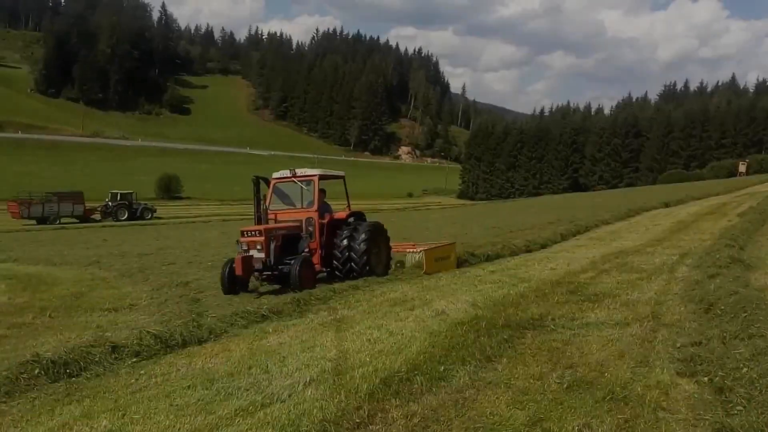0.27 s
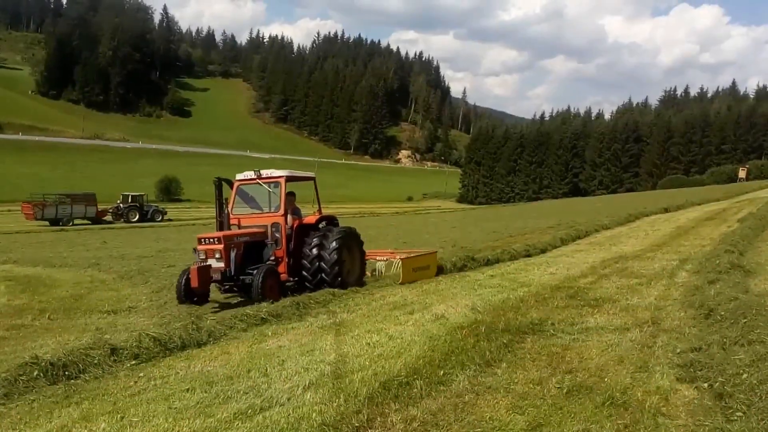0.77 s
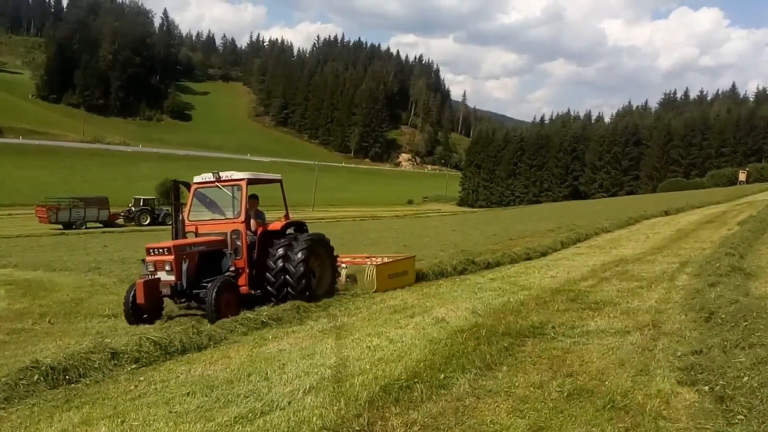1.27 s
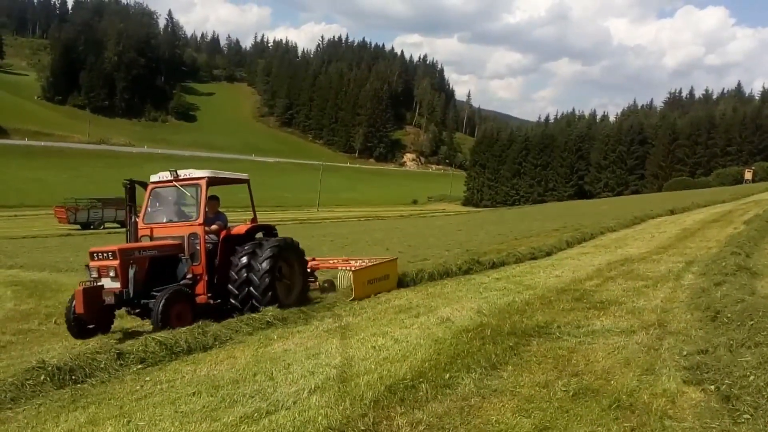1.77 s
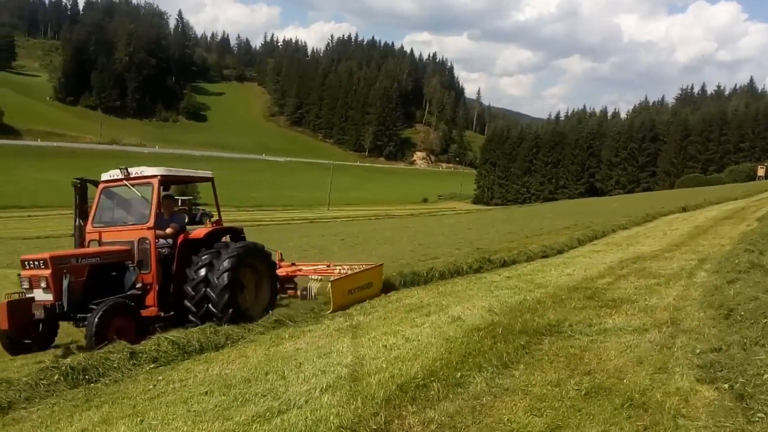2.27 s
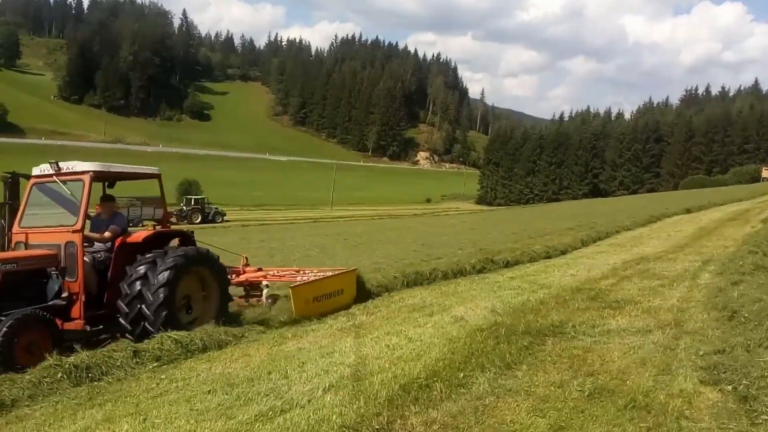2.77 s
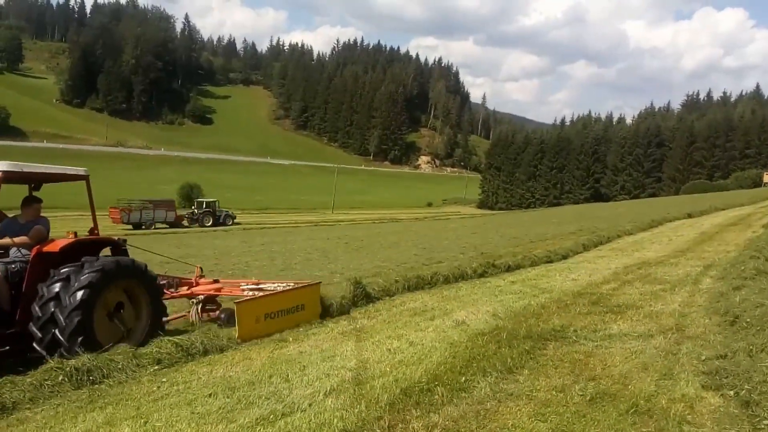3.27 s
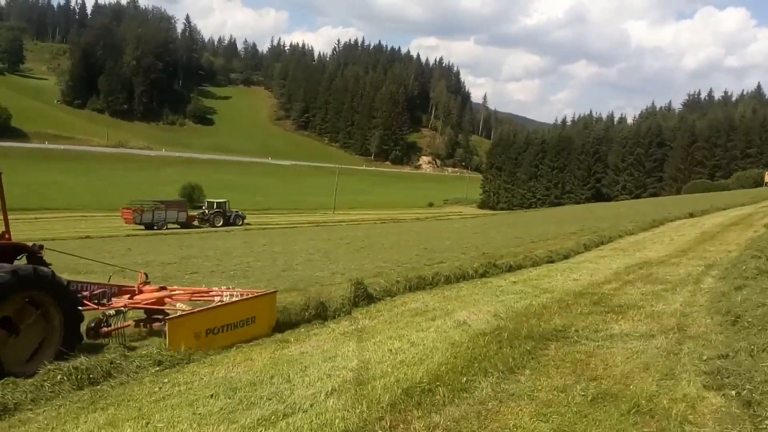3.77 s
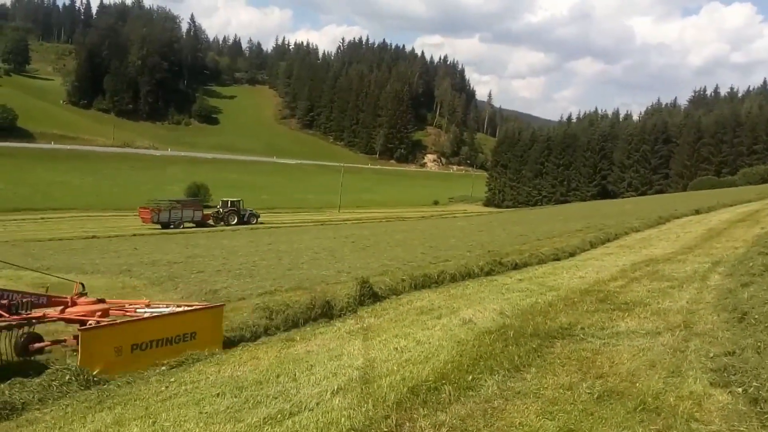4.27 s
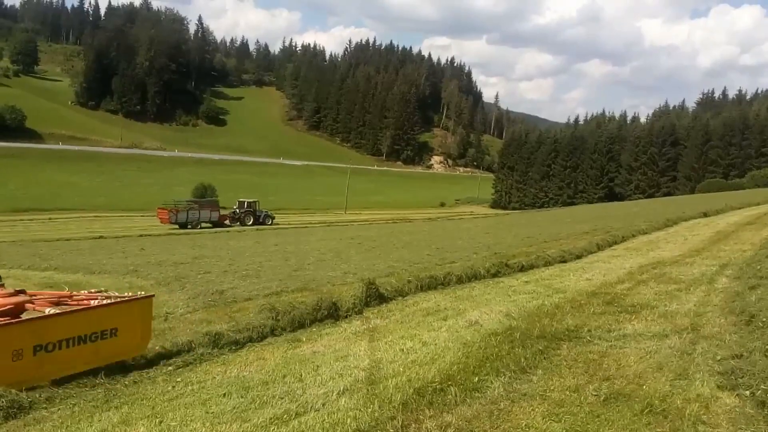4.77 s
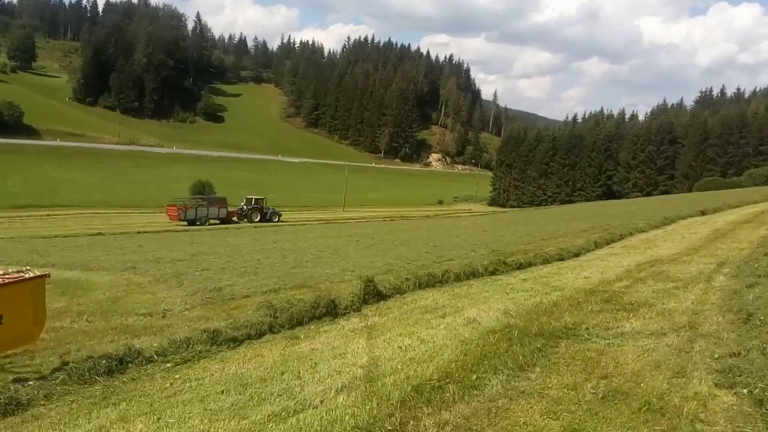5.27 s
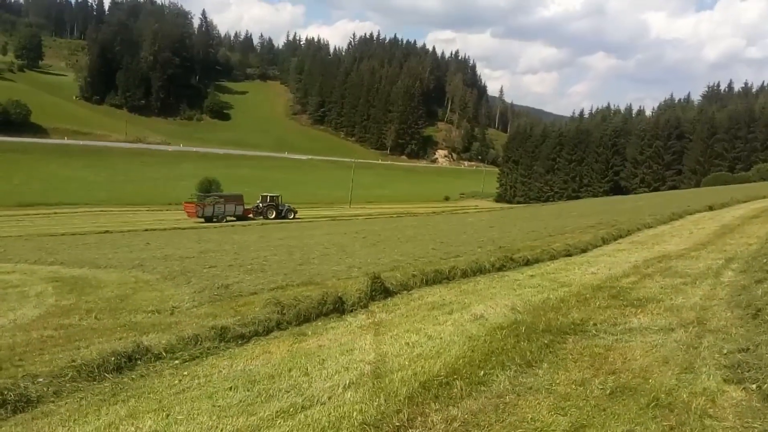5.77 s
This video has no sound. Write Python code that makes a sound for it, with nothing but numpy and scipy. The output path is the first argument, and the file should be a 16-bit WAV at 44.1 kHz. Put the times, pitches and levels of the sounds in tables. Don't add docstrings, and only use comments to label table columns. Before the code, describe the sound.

Steady throbbing tractor engine with knocking, faint gear whine and hissing rake tines passes close by outdoors, turning away amid soft low wind gusts.

```python
import sys
import numpy as np
from scipy import signal
from scipy.fft import rfft, irfft, next_fast_len
from scipy.io import wavfile
from scipy.ndimage import uniform_filter1d, map_coordinates

SR = 44100
rng = np.random.default_rng(int(sys.argv[2]) if len(sys.argv) > 2 else 0)


def attenuation_scalar(level_db):
    decades = np.asarray(level_db, float) / 20
    return 10 ** decades


def master_out(mix):
    frames = np.transpose(np.atleast_2d(mix))
    ceiling = np.clip(frames, -1, 1)
    pcm = np.round(ceiling * 32767).astype(np.int16)
    wavfile.write(sys.argv[1], SR, pcm)


N = 264952


def unit(x):
    return x / np.sqrt(np.mean(x ** 2) + 1e-20)


def along(points, hz):
    f, v = np.transpose(points)
    return np.interp(np.log(hz + 1), np.log(f + 1), v)


def curves(rows, t=None):
    s, *columns = np.transpose(rows)
    times = np.arange(N) / SR if t is None else t
    return [np.interp(times, s, column) for column in columns]


def swells(rows, floor_db):
    t = np.arange(N) / SR
    total = attenuation_scalar(floor_db)
    for s, db, half_s in rows:
        total = total + attenuation_scalar(db) * np.exp(-((t - s) / half_s) ** 2)
    return 20 * np.log10(total)


def wobble(rate):
    coarse = np.arange(0, N + 64, 32)
    knots = rng.standard_normal(int(N * rate / SR) + 4)
    smooth = map_coordinates(knots, [coarse * rate / SR], mode="nearest")
    return np.interp(np.arange(N), coarse, smooth)


def filtered(x, response):
    m = next_fast_len(N + 8192)
    return irfft(rfft(x, m) * response(np.fft.rfftfreq(m, 1 / SR)), m)[..., :N]


def rush(spectrum, patchy_db):
    z = signal.stft(rng.standard_normal((3, N)), nperseg=512)[2]
    field = uniform_filter1d(rng.standard_normal(z.shape[1:]), size=5, axis=0)
    field = uniform_filter1d(field, size=10, axis=1)
    noise = signal.istft(z * attenuation_scalar(patchy_db * unit(field)), nperseg=512)[1][:, :N]
    return unit(filtered(noise, lambda hz: attenuation_scalar(along(spectrum, hz))))


def tone(turns, db, rough_db):
    return np.sqrt(2) * attenuation_scalar(db + rough_db * wobble(10)) * np.cos(2 * np.pi * turns)


# time_s, turn [0-1]
TURN = [(0, 0), (1, 0.09), (2, 0.24), (3, 0.39), (4.2, 0.67), (5.4, .86), (6, 0.96)]


def facing(values, t=None):
    return np.interp(curves(TURN, t)[0], np.linspace(0, 1, len(values)), values)


# time_s, rate_hz [twice the firing rate]
ENGINE = [(0, 90.7), (.4, 91.5), (.65, 91.8), (.9, 92.6), (1.4, 91.8), (1.9, 92.95), (2.15, 93),
          (2.4, 92.2), (2.65, 92.1), (3.1, 92.7), (4.2, 92.35), (4.6, 91.4), (4.9, 90.85), (5.15, 91.2),
          (5.4, 92.6), (5.65, 92.2), (6, 91.2)]


def engine_cycle():
    return np.cumsum(curves(ENGINE)[0]) / SR / 6 + 1 - .41 / 6


def throb(cycle, delay, decay, depth, sizes):
    firings = 3 * cycle - delay
    k = np.floor(firings).astype(int)
    u = (firings - k) / decay
    chance = attenuation_scalar(1.4 * rng.standard_normal(400))
    size = np.array(sizes)[k % 3] * chance[k % 400]
    return unit(1 + depth * size * u * np.exp(1 - u))


# pitch_hz, level_db
BUFFET = [(5, -12), (12, -15.5), (27, -4), (45, -29.5), (65, -8), (130, -14), (220, -11), (400, -41),
          (800, -69.5), (2000, -120)]
# peak_s, level_db, half_length_s
GUSTS = [
    (0, -35, 0.38),
    (1.5, -36, .25),
    (4.55, -27, 0.24),
    (5.65, -28, .2),
]


def breeze():
    shared, left, right = rush(BUFFET, patchy_db=3.0)
    level_db = swells(GUSTS, floor_db=-60) + 0.72 * wobble(27)
    return attenuation_scalar(level_db) * (0.22 * shared + 0.22 * np.array([left, right]))


# start_s, level_db [peak]
TICKS = [
    (1.4465, -58),
    (1.8352, -49.5),
    (2.4836, -56),
    (3.3865, -50),
    (4.2694, -58),
    (5.7404, -62),
]


def snaps():
    x, t = np.zeros(N), np.arange(400) / SR
    for s, db in TICKS:
        x[round(s * SR):][:400] += attenuation_scalar(db + 4 - 60 * t / .006) * rng.standard_normal(400)
    crisp = [(3000, -50), (8000, 1), (12000, -4), (15000, -12)]  # pitch_hz, level_db
    return filtered(x, lambda hz: attenuation_scalar(along(crisp, hz)))


# time_s, level_db
RAKE = [(0, -30), (.8, -29.5), (1.25, -27), (2.2, -28), (2.8, -27), (3.9, -27.5), (4.4, -25.5),
        (4.8, -25.5), (5.3, -27), (5.6, -26), (6, -27.5)]
# pitch_hz, level_db
GRASS = [(1500, -39), (2800, -11.5), (3600, -7), (4300, -2.5), (5000, -3), (5600, -7), (6200, -9),
         (6900, -18.5), (7600, -26.5), (8300, -35), (9500, -120)]
# pitch_hz, level_db
CHAFF = [(5000, -120), (6500, -41), (7500, -33), (8100, 1), (8800, 4.5), (9700, 1), (10500, 3),
         (11700, -4.5), (12600, -4.5), (14600, -10), (15400, -16), (17000, -120)]


def rake(cycle):
    load_db, = curves(RAKE)
    chaff_db = -55 + 0.64 * (load_db - load_db.mean())
    sweep_db = 0.71 * wobble(9) + 0.36 * wobble(30)
    pulse = throb(cycle, delay=0.13, decay=0.32, depth=0.53, sizes=[1, 1, 1])
    grass = attenuation_scalar(load_db) * attenuation_scalar(sweep_db) * rush(GRASS, patchy_db=1.0)
    chaff = attenuation_scalar(chaff_db) * attenuation_scalar(.6 * sweep_db) * rush(CHAFF, patchy_db=1.5)
    return pulse * (grass + chaff)


GEARS = [55.4, 83, 99.2, 198.5]
# peak_s, level_db, half_length_s
GLINTS = [
    [(2.3, -37, 0.42), (3.8, -42.5, 0.58), (4.85, -33.5, 0.53)],
    [(1.7, -40.5, 0.18), (3.4, -39, .5), (4.85, -35, 0.36)],
    [(2.6, -32, .2), (5.5, -32.5, 0.33)],
    [(.65, -40, 0.53), (1.7, -56, .15), (3.3, -43, 0.51), (4.2, -43, 0.37)],
]
BACKLASH_TURNS = (.28, .3, .25, .17)


def gears(cycle):
    whine = np.zeros(N)
    for rows, teeth, blur in zip(GLINTS, GEARS, BACKLASH_TURNS):
        turns = teeth * cycle + blur * wobble(50)
        whine += tone(turns, swells(rows, floor_db=-52.5), rough_db=3)
    return whine


# ahead_db, front_quarter_db, rear_quarter_db, behind_db
SHAFT_DB = [
    (-45, -46, -45, -35.5),
    (-45, -46.5, -42, -53),
    (-48, -43, -61, -43),
]


def drive(cycle):
    first, third, fourth = map(facing, SHAFT_DB)
    low = -tone(7 * cycle, first, rough_db=5)
    middle = tone(21 * cycle, third - 2, rough_db=4.0)
    high = tone(28 * cycle, fourth - 2, rough_db=4.5)
    return low + middle + high


def rattle(cycle, spectrum):
    jumbles = rng.standard_normal((8, 2048))
    fade, k = np.modf(np.arange(N) / SR / 1.2)
    at, k = (cycle % 1 * 2048).astype(int), k.astype(int)
    old = np.cos(np.pi / 2 * fade) * jumbles[k, at]
    new = np.sin(np.pi / 2 * fade) * jumbles[k + 1, at]
    return unit(filtered(old + new, lambda hz: attenuation_scalar(along(spectrum, hz))))


# pitch_hz, level_db
HOOD = [(150, -55), (240, -11), (330, -0.5), (480, 0.5), (570, -4), (750, -43), (1000, -52), (2000, -120)]
BLOCK = [(400, -52), (620, -8), (780, 0), (1000, -3.5), (1300, -2.5), (1700, -2), (2100, -2), (2800, -75),
         (4000, -120)]
VALVES = [(1200, -61), (1700, -52), (2200, 2.5), (2700, -2), (3300, -4), (4200, -25), (5500, -120)]
RUMBLE = [(20, -30), (62, -6.5), (110, -0.5), (170, 3), (250, -6), (400, -49), (900, -120)]
# ahead_db, front_quarter_db, rear_quarter_db, behind_db
PANELS_DB = (-36.5, -34.5, -34.5, -31.5)
BLOCK_DB = (-30, -27, -27.5, -27)
VALVES_DB = (-37.5, -35, -35.5, -31)
RUMBLE_DB = (1, 0.43, 3.9, 2.6)


def clatter(cycle):
    panels, block, valves = attenuation_scalar([facing(PANELS_DB), facing(BLOCK_DB), facing(VALVES_DB)])
    panel_throb = throb(cycle, delay=0.64, decay=0.2, depth=0.37, sizes=[1, 1, 1])
    block_throb = throb(cycle, delay=0.1, decay=0.27, depth=0.56, sizes=[.8, .8, 1.3])
    valve_throb = throb(cycle, delay=0.028, decay=0.27, depth=0.64, sizes=[1.6, .9, .6])
    parts = [(panels, HOOD, .85, panel_throb),
             (block, BLOCK, .82, block_throb),
             (valves, VALVES, .45, valve_throb)]
    total = 0
    for level, spectrum, share, gate in parts:
        noise = np.sqrt(1 - min(share, .95) ** 2) * rush(spectrum, patchy_db=0.5)
        noise[0] += share * rattle(cycle, spectrum)
        total = total + level * gate * noise
    shudder = panels * attenuation_scalar(facing(RUMBLE_DB)) * rush(RUMBLE, patchy_db=2)
    return total + shudder


# pitch_hz, width_hz, level_db
CASTING = [(759, 85, 8), (910, 50, -17), (1320, 120, -5.5), (1405, 103, 11.5), (2230, 73, 17)]


def knock(cycle):
    blows = np.zeros(N)
    for delay, db in [(.015, 13), (.36, 8.5), (.41, 12.5), (.7, -13)]:
        at = np.flatnonzero(np.diff(np.floor(cycle - delay)))
        blows[at] += attenuation_scalar(db + 1.8 * rng.standard_normal(200)[:len(at)])

    def ringing(f):
        ring = 0
        for k, (center, width, db) in enumerate(CASTING):
            damping = 1j * f * width
            ring = ring + (-1) ** k * attenuation_scalar(db) * damping / (center * center - f * f + damping)
        soft = 1 / (1 + 1j * f / 2600) ** 6
        return ring * soft * f ** 2 / (f ** 2 + 600 ** 2)

    return attenuation_scalar(facing(BLOCK_DB) - 7) * unit(filtered(blows, ringing))


# order [per engine cycle], level_db [under the strongest]
UNEVEN = [(1, -26), (2, -45), (3, -18.5), (4, -31), (5, -31), (6, 0), (7, -20), (8, -46), (9, -3),
          (10, -21), (11, -72), (12, -11), (13, -25), (14, -36.5), (15, -15), (16, -26), (17, -23),
          (18, -24.5)]
# ahead_db, front_quarter_db, rear_quarter_db, behind_db
NOTE_DB = (-21, -21, -21, -22)
THIRD_DB = (-3.5, -3.5, -7.5, -13.5)
FOURTH_DB = (-10.5, -12, -8.5, -18)
SPREAD_TURNS = (-.115, -.07, -.01, .06)


def exhaust(cycle):
    second = facing(NOTE_DB)
    third, fourth = second + facing(THIRD_DB), second + facing(FOURTH_DB)
    firing = {6: second, 9: third, 12: fourth, 15: third - 11}
    hum, spread = np.zeros(N), facing(SPREAD_TURNS)
    for order, db in UNEVEN:
        if order % 3 == 0:
            skew = spread * (max(order - 6, 0) / 3) ** 1.3
        else:
            skew = rng.random()
        level_db = firing.get(order, second + db - 2.5)
        rough_db = .35 if order in firing else 2
        if order % 7 > 0:
            hum += tone(order * cycle + skew, level_db, rough_db)
    return hum


# pitch_hz, share [0-1]
DIFFUSE = [(100, 0.15), (500, 0.17), (1000, 0.5), (2100, 0.62), (2900, 0.46), (5000, 0.56), (10000, 0.94)]
# pitch_hz, level_db
LEFT = [(50, -2.5), (100, -3), (200, -2.5), (400, -2), (650, -0.5), (1000, -4.5), (2200, -2.5), (5000, -1),
        (9000, -3), (13000, -8)]
LAG_SAMPLES = (2.26, 20.63)
# ahead_db, front_quarter_db, rear_quarter_db, behind_db
SHADE_DB = (4.5, 1.5, -.5, -5.5)
# delay [ms], then strength [0-1]
ECHO_MS = [
    (.82, 0.803, .64, 0.27),
    (.89, 0.948, 0.871, 0.731),
]
ECHO_SHARE = [
    (0.59, 0.62, 0.44, 0.045),
    (0.44, 0.7, 0.6, 0.3),
]


def ports(x):
    hz, t, (direct, *scattered) = signal.stft(x, SR, nperseg=1024, noverlap=768)
    hz = hz[:, None]
    lag, shade_db = facing(LAG_SAMPLES, t), facing(SHADE_DB, t)
    delays_ms = [facing(v, t) for v in ECHO_MS]
    strengths = [facing(v, t) for v in ECHO_SHARE]
    share = np.clip(along(DIFFUSE, hz), 0, 1)
    half = np.exp(-1j * (np.pi * hz * lag / SR - .06))
    treble = hz ** 2 / (hz ** 2 + 2500 ** 2)
    tilt = attenuation_scalar((along(LEFT, hz) + shade_db * treble) / 2)
    sides, phases, extra_ms = (1, -1), (.05, .1), (.27, .16)
    out = []
    for side, delay, strength, phase, later, other in zip(
            sides, delays_ms, strengths, phases, extra_ms, scattered):
        reach = np.clip(strength, 0, 1) * hz / (hz + 60) / (1 + (hz / 4800) ** 2)
        echo_turns = (hz * delay + np.maximum(hz - 2000, 0) * later) / 1000
        comb = 1 + reach * np.exp(1j * (phase - 2 * np.pi * echo_turns))
        comb = comb / np.where(hz < 260, np.abs(comb), np.sqrt(1 + reach ** 2))
        heard = np.sqrt(1 - share ** 2) * direct + share * other
        out.append((half * tilt) ** side * comb * heard)
    return signal.istft(np.array(out), SR, nperseg=1024, noverlap=768)[1][:, :N]


def scene():
    cycle = engine_cycle()
    machine = rake(cycle) + clatter(cycle)
    machine[0] += snaps() + gears(cycle) + drive(cycle) + knock(cycle) + exhaust(cycle)
    return breeze() + ports(machine)


def low_pass(x):
    return signal.sosfilt(signal.butter(12, 15480, fs=SR, output="sos"), x)


def record(dry):
    hz, t, z = signal.stft(dry, SR, nperseg=2048)
    band = uniform_filter1d(np.abs(z) ** 2, size=5, axis=1).mean(0)
    hearing = [(7000, 4), (10500, 1), (11500, -8), (14000, -18), (15000, -24)]  # pitch_hz, level_db
    treble = np.median(band[(hz > 8500) & (hz < 11000)], axis=0)
    threshold = uniform_filter1d(treble, size=9) * attenuation_scalar(along(hearing, hz))[:, None]
    keep = (band > threshold) | (hz[:, None] < 7000)
    kept = signal.istft(z * keep, SR, nperseg=2048)[1][:, :N]
    return low_pass(kept)


dry = scene()
out = record(dry)
master_out(out)
```